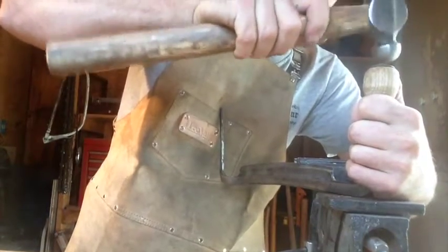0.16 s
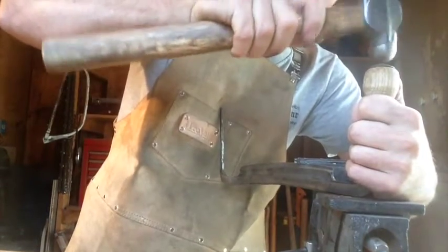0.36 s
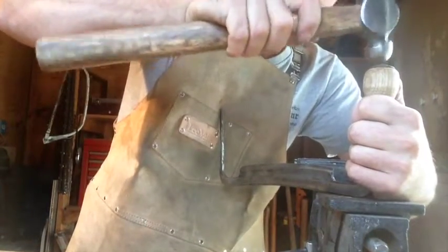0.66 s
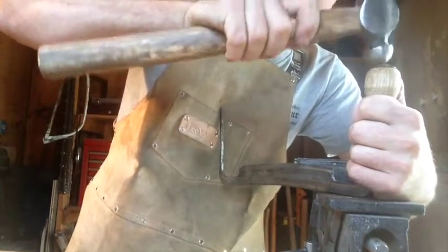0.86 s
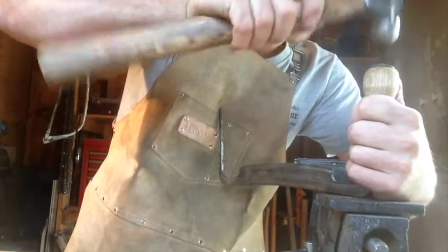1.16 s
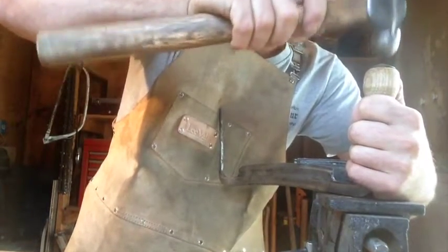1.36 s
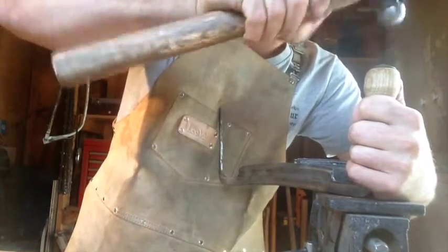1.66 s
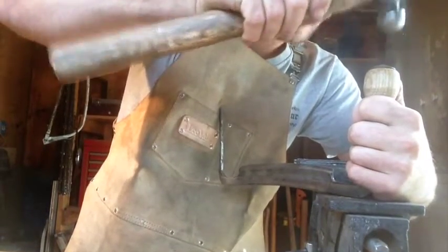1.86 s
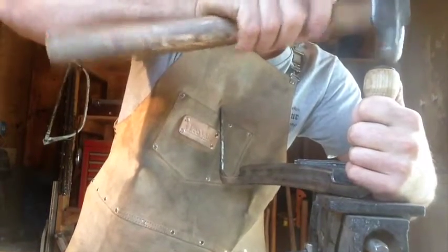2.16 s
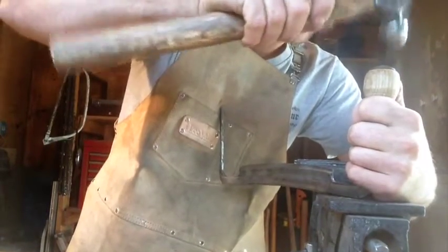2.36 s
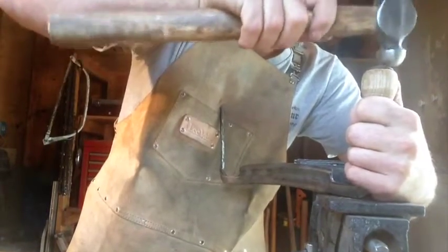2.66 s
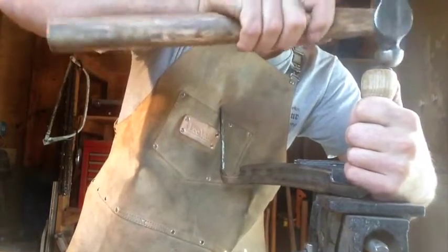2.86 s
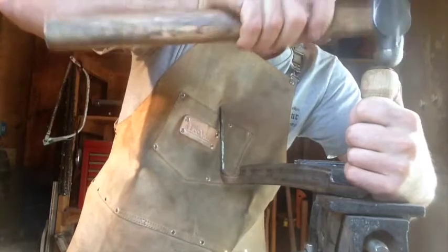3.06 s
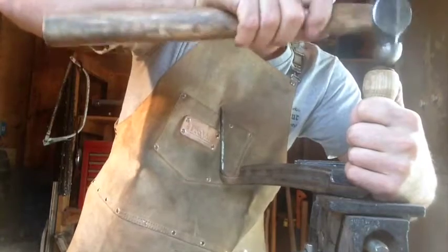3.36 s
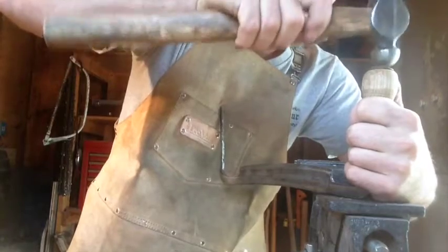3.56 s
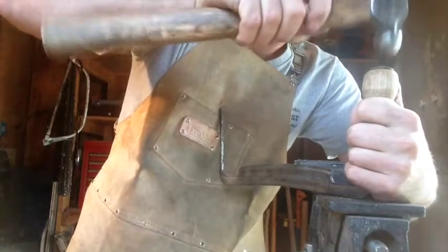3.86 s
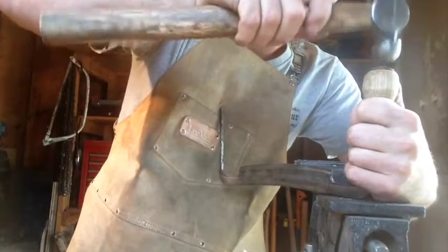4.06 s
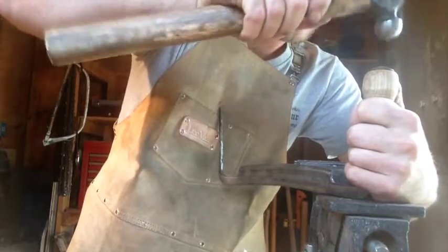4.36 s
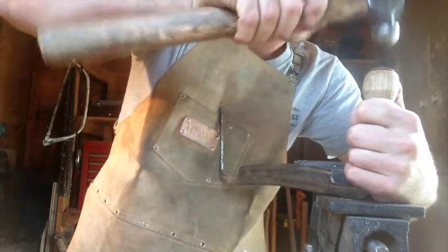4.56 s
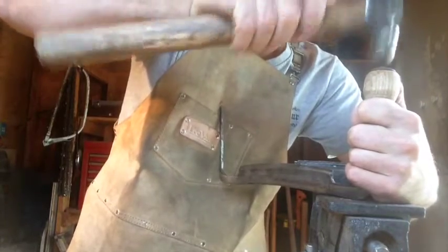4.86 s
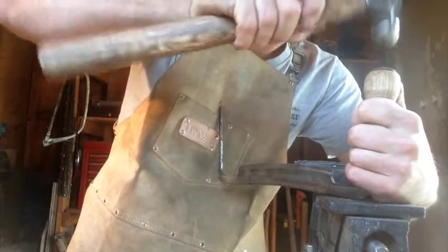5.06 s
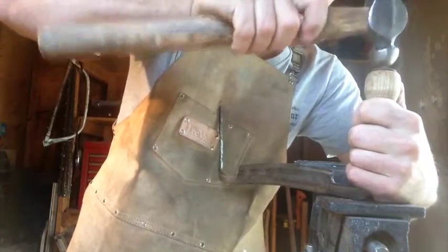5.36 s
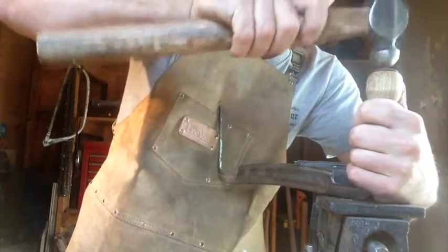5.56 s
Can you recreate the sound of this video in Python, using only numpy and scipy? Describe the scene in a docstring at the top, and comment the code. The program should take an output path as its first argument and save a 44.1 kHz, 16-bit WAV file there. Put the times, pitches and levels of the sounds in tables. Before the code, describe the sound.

A small hammer strikes the steel tang of a blade clamped in a vice, steadily, a little over four times a second. Each blow gives a sharp metallic crack, a short ringing chatter of the blade in the jaws and a dull bench thump. Light taps mix with heavier hits, and the hammer occasionally bounces. A mono microphone sits close by in a small, dry workshop.

```python
"""A small ball-peen hammer taps the end of a steel tang, about 4.4 blows a second, at a workshop bench.
The blade is clamped in a vice: each blow cracks steel on steel, sets the blade chattering in the jaws
and thumps vice and bench. Light taps crack sharply; heavy ones thump harder and chatter longer.
Behind them a small, dry room answers with a smooth treble tail, over the faint noise of still air.
One mono microphone stands close to the work and rounds off the peaks."""
import sys
import numpy as np
from scipy import signal
from scipy.fft import rfft, irfft
from scipy.io import wavfile

SR = 44100
rng = np.random.default_rng(int(sys.argv[2]) if len(sys.argv) > 2 else 0)


def waveform_to_disk(signal):
    """Save audio, clipped to [-1, 1], as 16-bit WAV at the path in sys.argv[1]."""
    frames = np.transpose(np.atleast_2d(signal))
    scaled = np.clip(frames, -1, 1) * 32767
    samples = np.round(scaled).astype(np.int16)
    wavfile.write(sys.argv[1], SR, samples)


N = 251935
T = np.arange(SR // 2) / SR  # time within one blow [s]
CONTACT_HZ = 3710  # the note of steel on steel


# blows on the tang: (time [s], weight of swing [dB], extra blade ring [dB], squareness of hit [dB])
HAMMER_BLOWS = [(-.034, 0.5, 0.5, 2.5), (.1971, 5, 0.5, -5), (0.4304, 4, -1, -5), (0.6542, -3, -2, 0),
                (.883, -4.5, -0.5, 1), (1.1011, -2.5, -4.5, -4), (1.3316, 3.5, -5.5, -4),
                (1.5599, 4, 1, -1.5), (1.7886, 7, 2.5, 2), (2.017, 4.5, 2.5, -3), (2.241, 5.5, -4.5, -5.5),
                (2.4655, -2.5, -4.5, 1), (2.6855, -14, 0, -3), (2.9091, -2, -1, 2), (3.1341, -1, -0.5, 1.5),
                (3.3616, 5, -1.5, -2.5), (3.588, -4.5, 1, -6), (3.8256, -3.5, -.5, -3),
                (4.0483, 4, 2, -0.5), (4.2716, 3, 1.5, -1.5), (4.5053, 2.5, 1.5, -5.5),
                (4.7295, -2, 0.5, -2.5), (4.951, -5, 2, -1), (5.172, -4, -2, -1.5), (5.387, 6.5, -0.5, -1),
                (5.6005, -1.5, -3.5, -1.5)]
# the hammer drops back on the tang: (time [s], level [dB])
HAMMER_REBOUNDS = [(.2475, -10), (3.401, -9), (4.0955, -10), (4.313, -8)]
def hammering(lead_s):
    """All blows and rebounds at close range, as (steel, thumps), starting lead_s before time zero."""
    steel, thumps = np.zeros((2, round(lead_s * SR) + N))
    for s, weight_db, extra_ring_db, square_db in HAMMER_BLOWS:
        metal, thump = blow(weight_db, extra_ring_db, square_db)
        add(steel, lead_s + s, metal)
        add(thumps, lead_s + s, thump)
    for s, db in HAMMER_REBOUNDS:
        add(steel, lead_s + s, undb(db) * crack(bright_db=-9, ring_hz=CONTACT_HZ))
        add(thumps, lead_s + s, undb(db) * bench(thump_db=-2.5, knock_db=-8))
    return steel, thumps


def blow(weight_db, extra_ring_db, square_db):
    """One blow as (steel, thump): a light tap springs off, a heavy one drives the blade into the jaws."""
    hit_db = -2.8 - .19 * weight_db + .32 * square_db  # a square hit is louder
    bright_db = -3.5 + square_db - hit_db  # and brighter
    contact_hz = CONTACT_HZ * np.exp(.02 * rng.standard_normal())  # wanders with the spot that is hit
    strike = undb(8 + hit_db) * (crack(bright_db, contact_hz) + head())
    rattle = blade(ring_db=4.5 + .24 * weight_db + extra_ring_db,
                   clatter_db=-1.75 + 1.2 * weight_db,
                   peak_s=.008 * np.exp(.02 * weight_db))
    thump = bench(thump_db=-2.92 + .42 * weight_db, knock_db=-3.5 - .05 * weight_db)
    return strike + rattle, thump


# colour of the steel contact, close up: (frequency [Hz], relative level [dB])
CRACK_COLOUR = [(300, -1.5), (600, 3.5), (1100, -3.5), (1500, -9.5), (2000, -10), (2700, -6.5), (3300, -5),
                (3900, 0), (4700, -5), (5700, -8), (7400, -6.5), (9000, -15), (12000, -16.5), (15500, -28)]
def crack(bright_db, ring_hz, tick_db=-11, note_db=-12):
    """Steel meets steel: a tick, a dense burst of modes damped by the fist, and the contact's note."""
    burst = unit(noise() * fade(t60=.018))
    tick = undb(tick_db) * unit(noise() * fade(t60=.0024))
    note = undb(note_db) * unit(ring(ring_hz, t60=.028))
    impact = unit(colour(burst + tick, CRACK_COLOUR))
    return colour(impact, [(3500, .038), (7500, bright_db)]) + note


# modes of the hammer head and the tang's free end: (frequency [Hz], level [dB], t60 [s])
HEAD_MODES = [(2046, -23, 0.099), (2525, -19, 0.028), (2835, -18, 0.06), (3110, -22.5, .05),
              (3750, -21, 0.097), (4260, -25.5, 0.087), (4604, -16.5, 0.047), (5470, -20.5, 0.1),
              (7840, -26.5, 0.14), (8330, -29, .03), (11900, -37.5, 0.089)]
def head():
    """Hammer head and tang ring the same few short notes at every blow, in changing proportions."""
    modes = vary(HEAD_MODES, detune=.0025, scatter_db=3)
    return sum(undb(db) * unit(ring(hz, t60)) for hz, db, t60 in modes)


# modes of the blade clamped in the vice: (frequency [Hz], relative level [dB], t60 [s])
BLADE_MODES = [(1110, -13.5, 0.29), (1203, -10, 0.068), (1253, -17, 0.23), (1348, -4.5, 0.13),
               (1388.4, 3, 0.057), (1405, -10.5, 0.32), (1440, -8, 0.32), (1470, -18.5, 1),
               (1555, 3, 0.023), (1700, -12, 0.046), (1995, -7, 0.11), (2377, -28.5, .04),
               (2838, -4.5, 0.095), (3190, -13, .08)]
# colour of the clicks in the jaws: (frequency [Hz], relative level [dB])
CLATTER_COLOUR = [(300, -8.5), (700, 9.5), (1100, -2.5), (1420, 7.5), (1750, 8), (2200, 1.5), (3000, -0.5),
                  (5000, -11.5), (8000, -17.5), (15000, -22)]
def blade(ring_db, clatter_db, peak_s):
    """Each contact in the jaws rings the blade and clicks grittily; the grip shifts the modes a little."""
    contacts = chatter(peak_s)
    modes = vary(BLADE_MODES, detune=.007, scatter_db=2)
    ringing = sum(undb(db) * unit(through(contacts, ring(hz, t60))) for hz, db, t60 in modes)
    grit = through(contacts, fade(t60=.007)) * noise()
    return undb(ring_db) * unit(ringing) + undb(clatter_db) * unit(colour(grit, CLATTER_COLOUR))


def chatter(peak_s, gap_s=.002, scatter_db=4, count=26):
    """The jolted blade rocks in the jaws: uneven contacts that swell until peak_s and die out."""
    spacing, strength = rng.random((count, 2)).T
    times = np.cumsum(gap_s * (.5 + spacing))
    age = times / peak_s
    sizes = age ** 2 * np.exp(-2 * age) * undb(scatter_db * (2 * strength - 1))
    contacts = np.zeros(len(T))
    contacts[(times * SR).astype(int)] = sizes * (-1) ** np.arange(count)
    contacts[0] = .07  # the jolt itself
    return contacts


# modes of vice and bench: (frequency [Hz], level [dB], t60 before the cap [s])
BENCH_MODES = [(67.7, -31.5, 0.3), (105, -42.5, 0.34), (140.5, -37.5, 0.6), (248.5, -33, 0.13),
               (251.2, -30, 0.28), (292.2, -21.5, 0.2), (346, -22.5, 0.16), (423, -18.5, 0.1),
               (430.7, -32, .22), (511, -29.5, 0.076), (564, -35, 0.11), (612.3, -23.5, 0.13),
               (663.7, -27, 0.067), (710, -27, 0.097), (890, -42, 0.084), (963, -37, 0.044),
               (1059, -25, 0.087)]
# modes of the bench leg landing on the floor: (frequency [Hz], level [dB], t60 [s])
LEG_MODES = [(92.5, -25, 0.082), (252, -10.5, 0.011)]
# bass colour of the thump, deep bass cut and 100-400 Hz full: (frequency [Hz], gain [dB])
THUMP_COLOUR = [(20, -32), (38, -29.5), (60, -6.5), (80, -9.5), (105, 3), (200, 3.5), (400, 2)]
def bench(thump_db, knock_db, split_hz=480, max_t60=.5, wall_s=.012395, leg_s=.0402):
    """Vice and bench ring: low modes grow with the blow's weight, the higher knock is nearly constant."""
    body = np.zeros(len(T))
    for hz, db, t60 in vary(BENCH_MODES, detune=.0094, scatter_db=.7):
        drive_db = thump_db if hz < split_hz else knock_db
        body += undb(db + drive_db) * ring(hz, min(t60, max_t60))
    add(body, wall_s, .3 * body)  # the nearest wall returns the thump
    leg = sum(undb(db + thump_db) * ring(hz, t60) for hz, db, t60 in LEG_MODES)
    add(body, leg_s, -leg)  # the jolted bench settles with a dull knock
    swell = 1 - np.exp(-T / .022)  # a low boom swells after the blow and dies away
    boom = undb(thump_db - 9) * ring(hz=164.3, t60=.2) * swell
    return colour(body, THUMP_COLOUR) + boom


# reverberation of the small workshop: (frequency [Hz], relative level [dB], t60 [s])
WORKSHOP_DECAY = [(108, 12, 0.47), (324, -2, 0.34), (720, 11.5, 0.17), (1426, 1.5, 0.21), (3060, -3, 0.19),
                  (6340, -9.5, 0.17), (9600, -1.5, 0.11), (13900, -3.5, 0.058)]
def workshop(build_s=.013, bands=16):
    """The room's impulse response: a diffuse tail that builds quickly; the treble dies first."""
    hz, db, t60 = np.transpose(WORKSHOP_DECAY)
    log_hz = np.log(hz)
    grid = np.log(np.maximum(np.fft.rfftfreq(len(T), 1 / SR), 1))
    centres = np.linspace(log_hz[0], log_hz[-1], bands)
    spectrum, tail = rfft(noise()), 0
    for centre, share in zip(centres, np.eye(bands)):
        band = irfft(spectrum * np.interp(grid, centres, share), len(T))
        gain = undb(np.interp(centre, log_hz, db))
        tail += band * gain * fade(np.interp(centre, log_hz, t60))
    return unit(tail * build_up(build_s))


# colour of the room's treble tail: (frequency [Hz], relative level [dB])
WASH_COLOUR = [(1200, -16), (2000, -1), (3000, 2.5), (4200, -1.5), (5500, -5.5), (8000, -8), (9500, -14.5),
               (12000, -20), (15500, -26)]
def treble_wash(steel, from_hz=2000, level_db=-8.5):
    """The room's smooth, hissy treble tail, which follows the energy of each blow."""
    treble = highpass(steel, from_hz)
    decay = unit(fade(t60=.14) * build_up(.0082))
    envelope = np.sqrt(np.abs(through(treble ** 2, decay ** 2)))
    return undb(level_db) * envelope * hiss(len(steel), WASH_COLOUR)


# room tone at the microphone: (frequency [Hz], relative spectral density [dB])
AIR_COLOUR = [(25, -20), (60, -3), (160, 1), (300, -12), (800, -21), (1400, -18), (2200, -29), (5000, -33),
              (10000, -39), (15000, -49)]
def still_air(level_db=-58):
    """The workshop's still air: a faint, steady noise, mostly bass."""
    return undb(level_db) * hiss(N, AIR_COLOUR)


def undb(db):
    """Decibels to gain."""
    return 10 ** (np.asarray(db) / 20)


def unit(x):
    """Scale to unit energy."""
    return x / np.sqrt(np.sum(x ** 2) + 1e-18)


def fade(t60):
    """Exponential decay by 60 dB in t60 seconds."""
    return np.exp(-np.log(1000) * T / t60)


def build_up(rise_s):
    """Smooth rise from 0 to 1."""
    return 1 - np.exp(-(T / rise_s) ** 2)


def ring(hz, t60):
    """One struck mode."""
    return np.sin(2 * np.pi * hz * T) * fade(t60)


def vary(modes, detune, scatter_db):
    """Shift each mode's pitch and level at random."""
    return [(hz * (1 + rng.normal(0, detune)), db + rng.normal(0, scatter_db), t60)
            for hz, db, t60 in modes]


def noise():
    """White noise as long as one blow."""
    return rng.standard_normal(len(T))


def hiss(length, curve):
    """Coloured noise at unit RMS."""
    return np.sqrt(length) * unit(colour(rng.standard_normal(length), curve))


def through(x, response):
    """Pass a sound through an impulse response."""
    return signal.fftconvolve(x, response)[:len(x)]


def highpass(x, hz):
    """Second-order low cut."""
    return signal.sosfilt(signal.butter(2, hz, "highpass", fs=SR, output="sos"), x)


def colour(x, curve, size=4096):
    """Causal filter with a (Hz, dB) curve, built from the cepstrum."""
    hz, db = np.transpose(curve)
    grid = np.maximum(np.fft.rfftfreq(size, 1 / SR), 1)
    gain = undb(np.interp(np.log(grid), np.log(hz), db))
    cepstrum = irfft(np.log(gain))
    cepstrum[1:size // 2] *= 2
    cepstrum[size // 2 + 1:] = 0
    return through(x, irfft(np.exp(rfft(cepstrum))))


def add(out, s, x):
    """Mix x into out, starting at time s."""
    i = round(s * SR)
    out[i:i + len(x)] += x[:max(len(out) - i, 0)]


def scene(steel_wet_db=-8.5, bench_wet_db=-22, lead_s=.1):
    """Close to the vice with the workshop behind, in mono; the work is already under way."""
    steel, thumps = hammering(lead_s)
    room = through(undb(steel_wet_db) * steel + undb(bench_wet_db) * thumps, workshop())
    air = still_air()
    work = steel + thumps + room + treble_wash(steel)
    return np.tile(work[round(lead_s * SR):] + air, (2, 1))


def record(dry, ceiling=.58, bottom_hz=42, top_hz=15350):
    """The close microphone rounds the loudest peaks and loses the deepest bass and the top."""
    rounded = ceiling * np.tanh(dry / ceiling)
    top_cut = signal.ellip(10, .2, 70, top_hz, fs=SR, output="sos")
    return signal.sosfilt(top_cut, highpass(rounded, bottom_hz))


dry = scene()
out = record(dry)
waveform_to_disk(out)
```